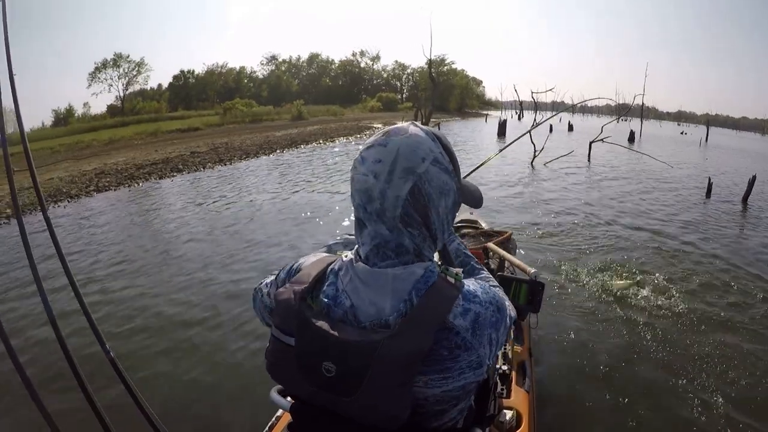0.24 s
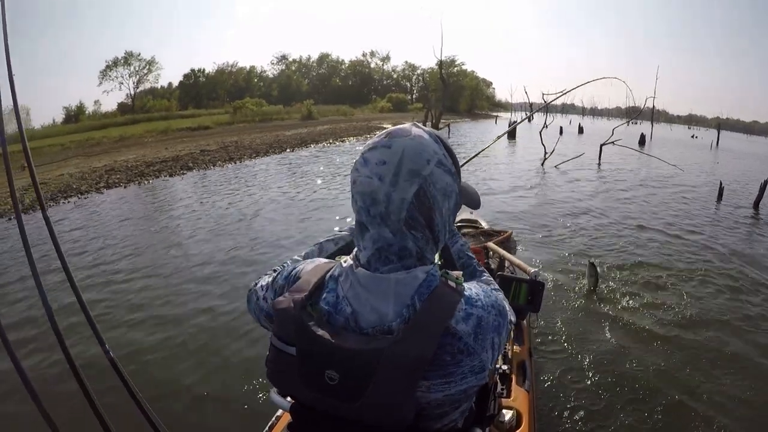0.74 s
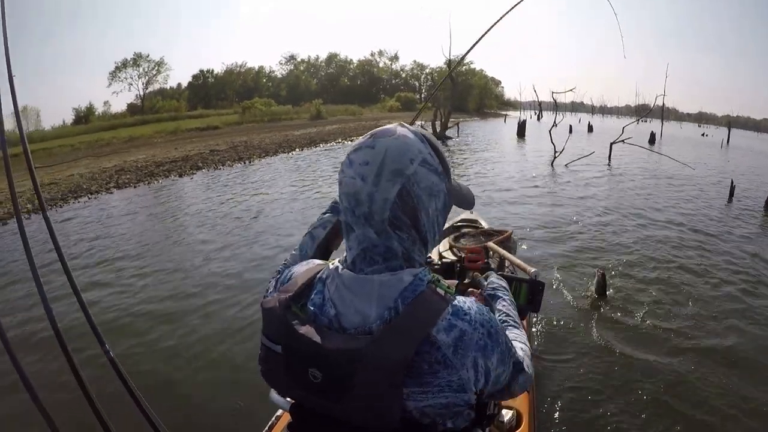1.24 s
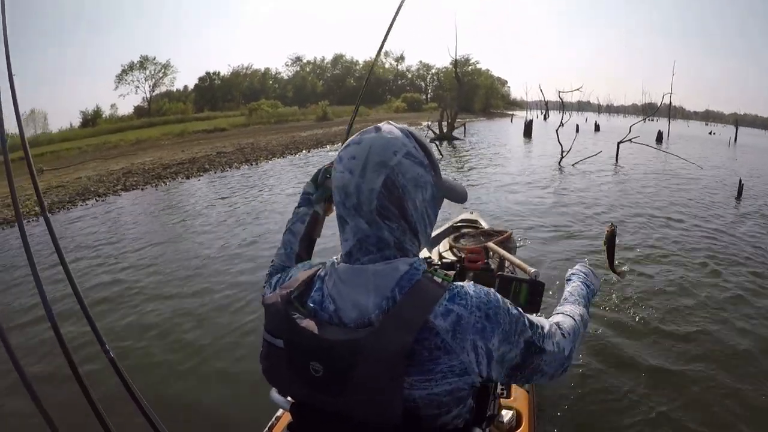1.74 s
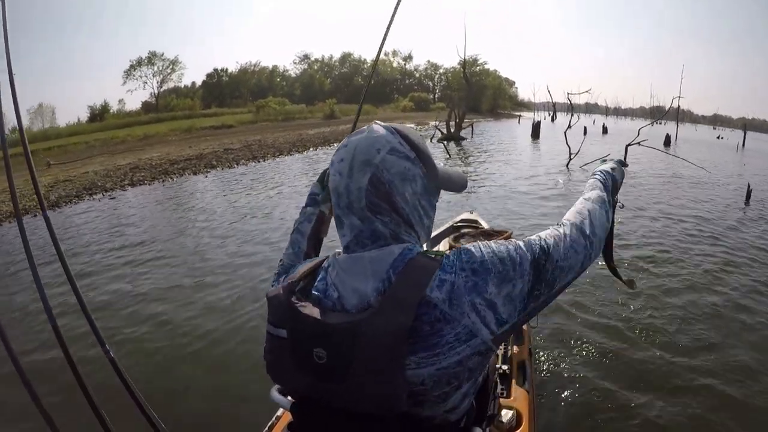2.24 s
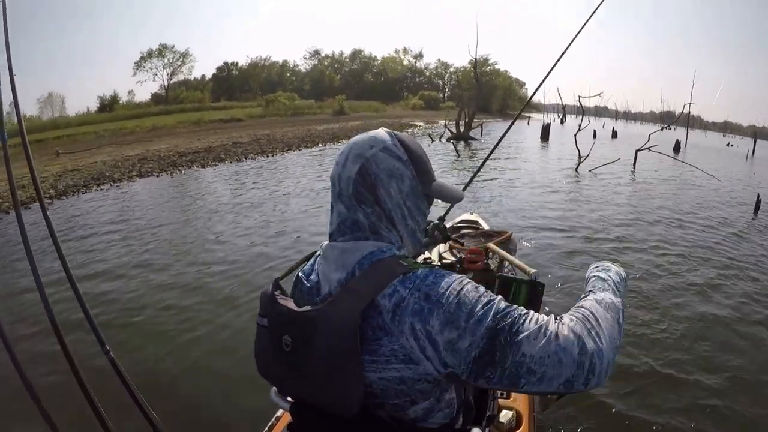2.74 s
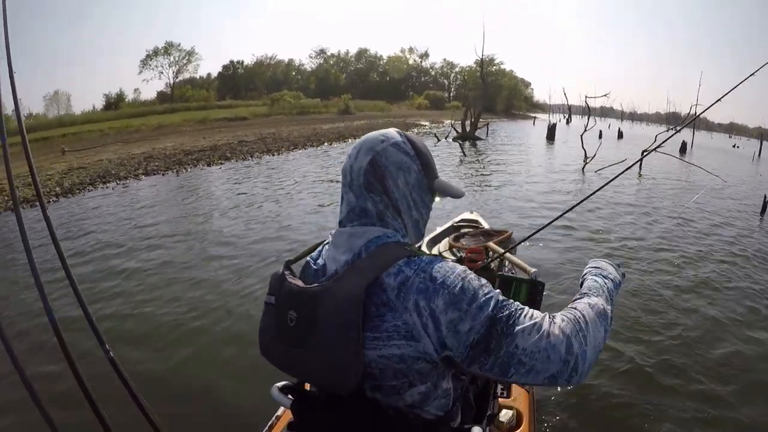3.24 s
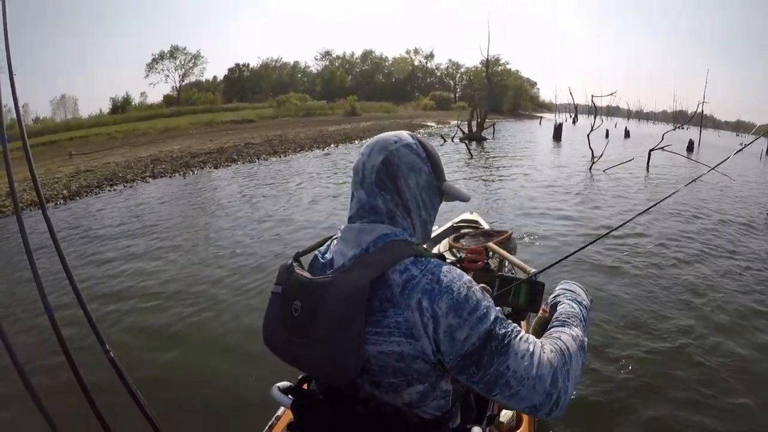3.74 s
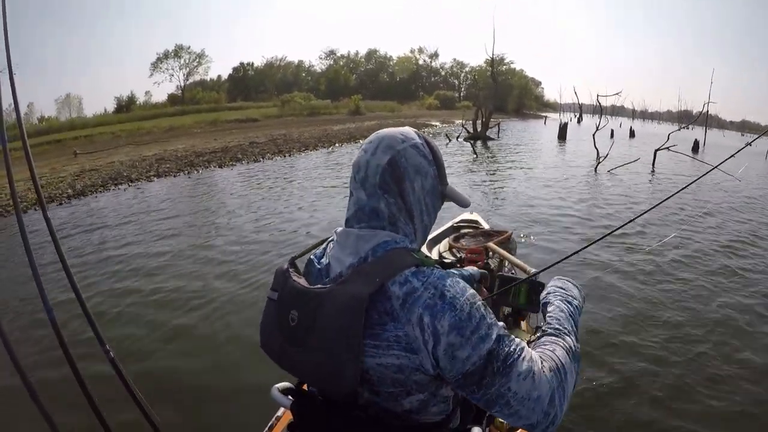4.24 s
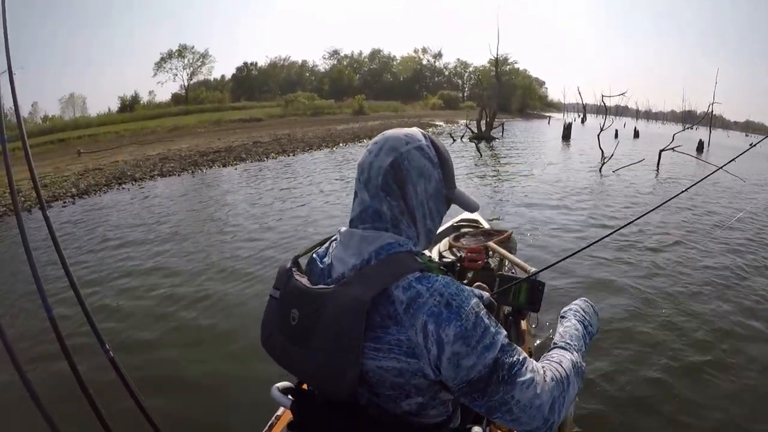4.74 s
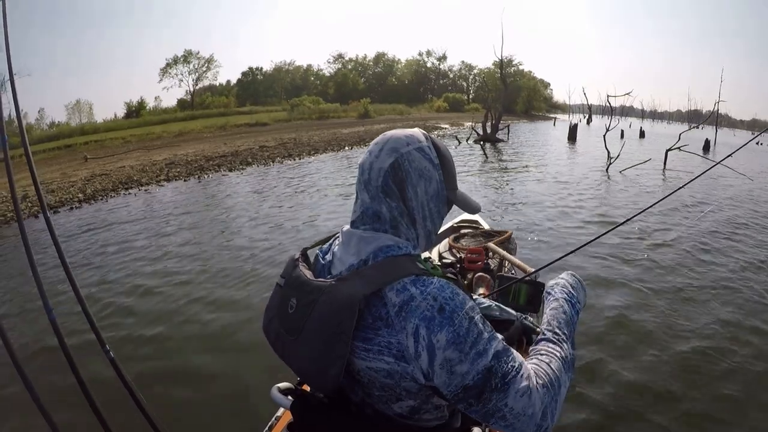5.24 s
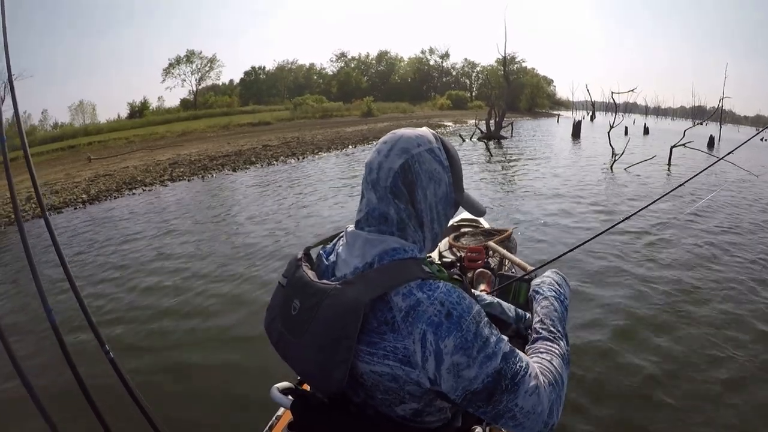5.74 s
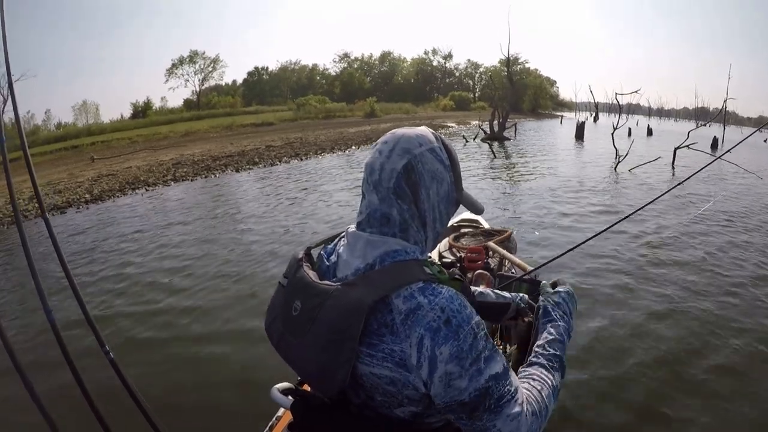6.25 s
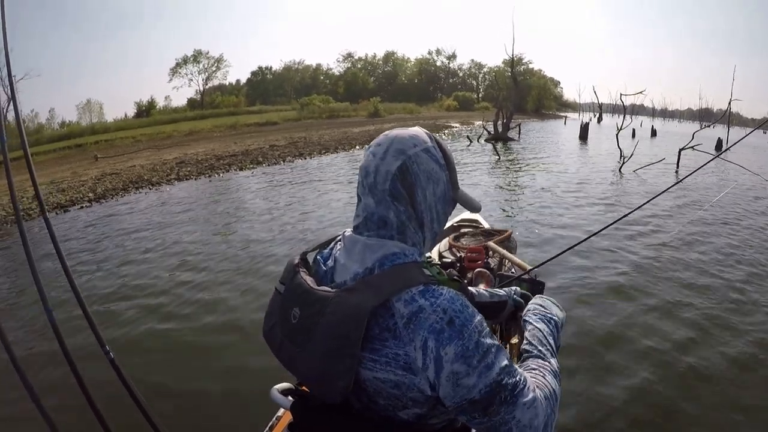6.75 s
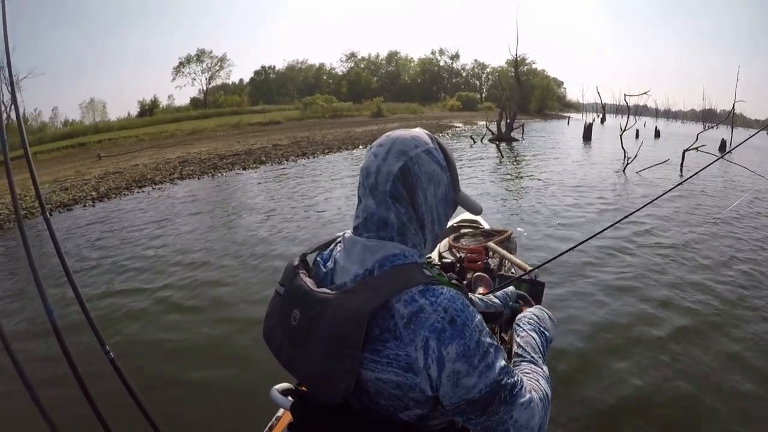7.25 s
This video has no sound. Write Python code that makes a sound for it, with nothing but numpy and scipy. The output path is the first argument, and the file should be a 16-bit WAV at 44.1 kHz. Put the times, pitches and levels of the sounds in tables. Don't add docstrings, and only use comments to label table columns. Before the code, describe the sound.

A small fish thrashes in spray beside a kayak, then hull knocks, tackle clicks and drips follow under low buffeting wind and hum.

```python
import sys
import numpy as np
from scipy import signal
from scipy.fft import rfft, irfft
from scipy.io import wavfile
from scipy.ndimage import uniform_filter1d

SR = 44100
rng = np.random.default_rng(int(sys.argv[2]) if len(sys.argv) > 2 else 0)


def master_out(mix):
    frames = np.transpose(np.atleast_2d(mix))
    ceiling = np.clip(frames, -1, 1)
    pcm = np.round(ceiling * 32767).astype(np.int16)
    wavfile.write(sys.argv[1], SR, pcm)


def invert_db(x):
    u = np.asarray(x, float) / 20
    return 10 ** u


N = 330074
T = np.arange(N) / SR

# time in seconds, gust at the ports in dB, vortex pull on the pole in dB.
WIND = [(0, -28.5, -40.5), (.3, -31.5, -43.5), (.7, -37, -40), (1.0, -36, -41), (1.4, -40.5, -36.5),
        (1.9, -34, -37.5), (2.95, -37, -35.5), (3.45, -52, -32), (3.65, -38.5, -39.5), (4.02, -28.5, -34.5),
        (4.42, -23.5, -36.5), (4.6, -34, -31), (5.77, -25, -29.5), (5.96, -32.5, -31), (6.21, -25, -26),
        (6.79, -28, -28), (7.48, -35, -30.5)]


def unit(x):
    return x / np.sqrt(np.mean(x ** 2))


def unit_peak(x):
    return x / np.abs(x).max()


def curves(table):
    s, *columns = np.transpose(table)
    return [np.interp(T, s, c, -120, -120) for c in columns]


def swells(start, length, db, rise, fall):
    start, length, db, fall = (np.reshape(v, (-1, 1)) for v in (start, length, db, fall))
    before = np.maximum(start - T, 0)
    after = np.maximum(T - start - length, 0)
    return invert_db(db - rise * before - fall * after).sum(axis=0)


def colour(x, table):
    hz, db = np.transpose(table)
    f = np.arange(N // 2 + 1) * SR / N + 1
    return unit(irfft(rfft(x) * invert_db(np.interp(np.log(f), np.log(hz), db)), N))


def ring(x, hz, width):
    return signal.lfilter(*signal.iirpeak(hz, hz / width, SR), x)


def flutter(hz, width):
    return unit(ring(ring(rng.standard_normal(N), hz, width), hz, width))


def walk(rate):
    k = int(SR / rate)
    held = np.repeat(rng.standard_normal(N // k + 1), k)
    return 1.204 * uniform_filter1d(uniform_filter1d(held, k), k)[:N]


def grit(rate, spread_db, smooth):
    size_db = spread_db * np.minimum(rng.exponential(size=N), 3)
    hits = (rng.random(N) < rate / SR) * invert_db(size_db)
    return unit(hits * rng.standard_normal(N)) + smooth * rng.standard_normal(N)


def add(out, s, x):
    i = max(int(s * SR), 0)
    out[..., i:i + x.shape[-1]] += x[..., :N - i]


def buffeting():
    # frequency in Hz, level in dB per Hz.
    shared_colour = [(15, -20), (30, 6.5), (45, -4), (60, 3.5), (110, -5.5), (150, -3.5), (260, -17),
                     (400, -31.5), (700, -71)]
    # frequency in Hz, level in dB per Hz.
    lone_colour = [(15, 8), (30, 6.5), (45, 1), (80, -2), (140, -1.5), (200, -4.5), (255, -19), (320, -42),
                   (600, -67)]
    # start in seconds, level in dB.
    puffs = [
        (.71, -32),
        (1.14, -37),
        (1.29, -29),
        (1.89, -36),
        (3.521, -32),
    ]
    gust_db, _ = curves(WIND)
    puff_s, puff_db = np.transpose(puffs)
    gust = invert_db(gust_db) + swells(puff_s, 0.0083, puff_db, 218, 168)
    both = colour(rng.standard_normal(N), shared_colour) * invert_db(1.36 * walk(10.0))
    left, right = (colour(rng.standard_normal(N), lone_colour) * invert_db(5.36 * walk(9.1)) for _ in range(2))
    return gust * (0.81 * both + np.array([0.11 * left - 0.27 * right, 1.07 * right]))


def pole_hum():
    # pitch in Hz, resonance width in Hz.
    hum_modes = [
        (85, 5),
        (189, 4.3),
        (387, 3),
    ]
    # start in seconds, length in seconds, level in dB.
    low_spells = [
        (0.196, 0.12, -40),
        (0.677, 0.046, -45),
        (1.006, 0.059, -39.5),
        (1.42, 1.0, -43),
        (4.014, 0.079, -27.5),
        (4.613, 0.46, -31.5),
        (5.25, 0.54, -28),
        (5.984, 0.82, -30.5),
        (6.884, 0.6, -33.5),
    ]
    # start in seconds, length in seconds, level in dB.
    rod_spells = [
        (0, 0.16, -49.5),
        (0.801, 0.71, -52.5),
        (2.636, .4, -52.5),
    ]
    _, pull_db = curves(WIND)
    low = invert_db(-51.5) + swells(*np.transpose(low_spells), 96, 85)
    rods = invert_db(-60) + swells(*np.transpose(rod_spells), 79, 40)
    out = np.zeros((2, N))
    for (hz, width), gain in zip(hum_modes, (low, invert_db(pull_db), rods)):
        tone = np.sqrt(2) * np.sin(2 * np.pi * hz * T + 2.1 * walk(width))
        hum = 0.81 * tone + 0.44 * flutter(hz, 2 * width)
        out += gain * hum * invert_db(np.array([[-.8], [.8]]))
    return out


def air():
    # frequency in Hz, level in dB.
    mid_colour = [(200, -66), (330, -72.5), (450, -79.5), (600, -85.5), (1100, -88.5), (2000, -95),
                  (3250, -96.5), (3600, -90), (5200, -90), (6300, -90), (7400, -96), (9500, -100),
                  (13500, -110), (15000, -124)]
    # frequency in Hz, level in dB.
    side_colour = [(200, -71), (330, -72), (450, -79), (800, -79), (1500, -88), (2000, -93), (3200, -99.5),
                   (4200, -93), (5200, -90), (6200, -86.5), (7200, -94), (8200, -96), (13500, -111),
                   (15000, -124)]
    mid = invert_db(-41.5) * colour(rng.standard_normal(N), mid_colour)
    side = invert_db(-44) * colour(rng.standard_normal(N), side_colour)
    swell = invert_db(0.2 * walk(1.4) + .7 * walk(25))
    return swell * np.array([mid + side, mid - side]) * invert_db(np.array([[-.6], [.6]]))


def camera():
    frame_hz, first_frame_s = 29.97, .0185
    ping_hz, ping_db, ping_s = 8600, -58, 0.0028
    whine_hz, whine_db = 6147, -66.5
    since = (T - first_frame_s + .5 / frame_hz) % (1 / frame_hz) - .5 / frame_hz
    shape = invert_db(ping_db) * np.exp(-(since / ping_s) ** 2)
    ping = shape * np.sin(2 * np.pi * ping_hz * since + 3 * walk(frame_hz))
    whine = invert_db(whine_db + 2.3 * walk(4.7)) * np.sin(2 * np.pi * whine_hz * T + 2.9 * walk(8.3))
    return ping + np.outer([1.5, .5], whine)


def bubble(hz, cycles, glide):
    u = np.arange(int(2.7 * cycles / hz * SR) + 4) * hz / SR / cycles
    turns = cycles * np.cumsum(2 ** (glide * (u - .3))) * u[1]
    return np.sin(2 * np.pi * turns) * unit_peak(u * np.exp(-4 * u))


def swarm(span, count, lo_hz, hi_hz, cycles, spread_db, glide):
    out = np.zeros(N)
    for s, pitch, size, length in rng.random((count, 4)):
        grain = bubble(lo_hz * (hi_hz / lo_hz) ** pitch, cycles * (.5 + length), glide)
        add(out, span[0] + (span[1] - span[0]) * s, invert_db(spread_db * size ** 2) * grain)
    return unit(out) * np.sqrt((span[1] - span[0]) * SR / N)


def thrash():
    # start in s, length in s, level in dB, fall in dB per s.
    bursts = [
        (0, 0.0079, -42.5, 92),
        (0, 0.25, -46, 16.5),
    ]
    # start in s, length in s, level in dB, rise and fall in dB per s.
    run_off = (1.0, 0, -49.5, 150, 255)
    # frequency in Hz, level in dB.
    spray_colour = [(600, -40), (1000, -4), (1500, -7), (2600, -2.5), (4200, -4.5), (5200, -8.5),
                    (6700, -2.5), (8200, -9.5), (11000, -20), (15000, -25)]
    start, length, db, fall = np.transpose(bursts)
    churn_end = invert_db(-130 * np.maximum(T - 0.85, 0))
    spray = swells(start, length, db, 0, fall) * churn_end + swells(*run_off)
    hiss = colour(grit(4000, 4.8, 0.55), spray_colour) * invert_db(2.0 * walk(70))
    fizz = swarm((0, 1.2), count=1200, lo_hz=1300, hi_hz=9500, cycles=6, spread_db=15, glide=.35)
    gurgle = swarm((0, 1.2), count=480, lo_hz=550, hi_hz=2600, cycles=5.5, spread_db=11, glide=0.3)
    drops = swarm((0, 1.2), count=110, lo_hz=2500, hi_hz=9000, cycles=2.5, spread_db=14, glide=.5)
    gurgle_gain = invert_db(-3 - 11 * T) * 0.83
    return spray * (0.61 * hiss + 0.33 * fizz + 0.27 * drops + gurgle_gain * gurgle)


def bubbles_and_drips():
    # start in seconds, peak in dB, pitch in Hz, glide in octaves.
    water_drips = [(0.018, -33.5, 2770, 0.13), (0.033, -36.5, 1520, 0.029), (.079, -35.5, 776, 0.11),
                   (.088, -38, 1600, 0.24), (.105, -40, 990, .2), (.12, -43, 1250, 0.45),
                   (.106, -43, 5440, 0.0077), (0.169, -38, 3200, 1.3), (0.181, -41, 1050, .2),
                   (0.188, -33, 1440, 1.1), (0.19, -37, 3620, .5), (.195, -36.5, 600, -0.065),
                   (.226, -43, 5170, 0.56), (.231, -40, 1160, -0.25), (0.257, -40, 2300, 1.1),
                   (.279, -38, 770, 0.29), (0.315, -37, 3350, 0.71), (0.36, -31, 2100, .3),
                   (.364, -39, 3500, 0.18), (0.401, -34, 3580, 1.9), (0.451, -50, 990, .05),
                   (0.463, -50, 950, 0.21), (.474, -43, 980, .05), (.474, -53, 1670, .2),
                   (.523, -51, 2400, .5), (.557, -40.5, 720, .3), (.564, -46, 2780, 0.3),
                   (.577, -45, 1100, .4), (.593, -43, 510, .5), (0.619, -38.5, 1520, 0.33),
                   (.62, -40, 544, .1), (.651, -52, 820, .05), (.653, -54, 1700, 0.22),
                   (.67, -48, 3300, .6), (0.683, -41, 1910, 1.3), (.704, -46, 740, .3),
                   (.706, -44, 3300, .05), (.745, -37, 5750, 0.09), (.756, -53, 1150, 0.37),
                   (.76, -48, 860, .1), (.765, -49, 2400, .3), (.783, -49, 1560, .05),
                   (.802, -50, 1130, .05), (.845, -40, 2800, 0.17), (.928, -42.5, 3000, 0.17),
                   (1.261, -41, 950, 0.21), (1.393, -43, 890, -0.053), (1.588, -47, 1680, -0.059)]
    # start in seconds, peak in dB, pitch
    # in Hz, glide in octaves.
    deck_drips = [(3.298, -41, 600, -0.026), (3.38, -44, 600, 0.12), (3.823, -28, 476, .25),
                  (4.056, -39, 3040, .3), (4.108, -40, 1420, .05), (4.122, -33, 3240, .2),
                  (4.14, -47, 3500, .1), (4.162, -42, 3730, 0.12), (4.163, -42, 1400, .1),
                  (4.176, -43, 1450, .3), (4.256, -45, 2170, .3), (4.294, -36.5, 2780, 0.02),
                  (4.297, -40, 1550, .05), (4.33, -42, 2780, .3), (4.411, -37, 4000, .2),
                  (4.412, -36, 1340, .1), (4.417, -44, 2160, 0.13), (4.431, -33, 926, 0.1),
                  (4.431, -43, 1900, .1), (4.44, -42, 1460, .3), (4.457, -39, 1480, .05),
                  (4.474, -45, 1030, .3), (4.49, -46, 1450, .1), (4.589, -39, 830, 0.18),
                  (5.488, -46, 1510, .05), (6.1, -41, 1300, 0.075), (6.372, -36.5, 1015, -.2),
                  (6.373, -33, 651, -0.15)]
    single = np.zeros(N)
    for s, db, hz, glide in water_drips + deck_drips:
        cycles = 10 * (hz / 1e3) ** 0.52
        add(single, s, invert_db(db) * bubble(hz, cycles, glide))
    return single * invert_db(3 * walk(500))


def crackles(table, dull_db, top_db, fizz_db):
    out, u = np.zeros(N), T[:SR // 12]
    for s, db, hz in table:
        t60 = .02 * (1 + 0.5 * min(invert_db(dull_db), 4))
        rise = np.minimum(u / .0022, 1) ** 2
        burst = rng.standard_normal((3, len(u))) * invert_db(-60 * u / t60) * rise
        centre = ring(ring(burst[0], hz, .5 * hz) + .5 * ring(burst[0], 1650, 1600), 2840, 3700)
        dull = ring(ring(burst[1], 810, 1200), 880, 1080)
        top = ring(ring(burst[2], 7200, 1900), 6400, 9500)
        share = np.sqrt(1 - min(invert_db(top_db), .95) ** 2)
        tick = share * unit_peak(centre) + invert_db(dull_db) * unit_peak(dull) + invert_db(top_db) * unit_peak(top)
        tick = signal.lfilter(*signal.butter(3, 9000, fs=SR), tick)
        fizz = ring(ring(burst[1], 14000, 7000), 14000, 7000)
        add(out, s - .0012, invert_db(db) * (tick + invert_db(fizz_db) * unit_peak(fizz)))
    return out


def fish_and_tackle():
    # start in seconds, peak in dB, centre in Hz.
    slaps = [(0.285, -34, 3430), (0.182, -35, 9000), (0.278, -38, 9500), (0.427, -31, 8000),
             (0.454, -30, 6500), (0.475, -28.5, 3740), (0.5636, -33, 2820), (0.5764, -43, 4120),
             (0.612, -38, 7000), (0.6704, -38.5, 7500), (0.695, -32, 7000), (0.7832, -30.5, 6170),
             (2.3046, -35, 6000), (2.313, -36, 5700), (2.4596, -36, 6200), (4.042, -27.5, 4000),
             (4.0568, -32, 1880), (4.103, -33, 1610), (4.243, -27, 2730), (4.089, -40, 6500),
             (6.0406, -33.5, 2600), (7.317, -32.5, 3700)]
    # start in seconds, peak in dB, centre in Hz.
    smacks = [
        (0.4121, -20.5, 3500),
        (4.2365, -23, 2590),
        (4.4562, -33.5, 3000),
    ]
    # start in seconds, peak in dB, centre in Hz.
    tackle = [(1.369, -41.5, 2000), (3.468, -34.5, 4800), (3.491, -43, 1200), (3.829, -33.5, 2900),
              (3.9773, -35, 3840), (3.998, -15, 1960), (4.1223, -30, 3330), (4.14, -30, 3620),
              (4.175, -29.5, 2170), (4.187, -25.5, 4130), (4.1985, -29, 1850), (4.293, -29, 1530),
              (4.33, -35, 2710), (4.153, -36, 4200), (4.162, -37, 3000), (4.257, -34, 2300),
              (4.308, -35, 5500), (4.081, -38, 3200), (4.4085, -29.5, 1510), (5.86, -32.5, 3480),
              (6.03, -38, 1490), (6.814, -44, 3000), (7.013, -40.5, 1860), (7.42, -44, 2500)]
    # start in seconds, peak in dB, centre in Hz.
    taps = [
        (3.051, -35, 1150),
        (5.2927, -37, 1660),
    ]
    # start in seconds, peak in dB, centre in Hz.
    clacks = [
        (5.6407, -47.5, 1510),
        (5.672, -35, 1520),
    ]
    # start in seconds, peak in dB, centre in Hz.
    snaps = [
        (0.353, -11, 3240),
        (3.065, -14.5, 3900),
        (3.067, -17.5, 8400),
        (4.2765, -24, 6800),
    ]
    # dull part in dB, top part in dB, fizz above the roll-off in dB.
    kinds = [
        (-23, -1, -24),
        (-15.5, -5, -30),
        (-11.5, -8, -34),
        (7.5, -2.5, -28),
        (19, -3, -26),
        (-17.5, -2.5, -18),
    ]
    tables = (slaps, smacks, tackle, taps, clacks, snaps)
    return sum(crackles(table, *kind) for table, kind in zip(tables, kinds))


def strikes(table, t60, common_db):
    # pitch in Hz, level in dB, 60 dB decay in seconds.
    hull = [(31.2, -21.5, 0.81), (61.2, -24.5, 0.34), (131.5, 0.5, 0.079), (246.6, -5.5, 0.073),
            (322.3, -14, 0.094)]
    # pitch in Hz, level in dB, 60 dB decay in seconds.
    deck = [(477, -3, 0.03), (600, -7.5, 0.051), (844, -7.5, 0.03), (1300, -5, 0.014)]
    out, u = np.zeros((2, N)), T[:SR // 2]
    chance = rng.standard_normal((len(table), 3, len(hull + deck)))
    for (s, db, hz, deck_db), (detune, uneven, phase) in zip(table, chance):
        modes = hull + [(f, g + deck_db, d) for f, g, d in deck]
        body = np.sin(2 * np.pi * hz * u) * invert_db(-60 * u / t60)
        for (f, g, d), a, b, c in zip(modes, detune, uneven, phase):
            level = invert_db(g + 1.83 * b - 60 * u / d)
            body += level * np.sin(2 * np.pi * f * (1 + 0.061 * a) * u + 2 * c)
        push = np.minimum(u / 0.00523, 1) ** 2
        blow = invert_db(db) * unit_peak(body * push) / np.hypot(1, invert_db(common_db))
        late = int(0.00065 * SR * min(abs(uneven[0]), 2))
        common = -invert_db(common_db) * np.roll(blow, late)
        add(out, s - .0045, np.array([common + blow, common - blow]))
    return out


def thumps():
    # start in seconds, peak in dB, pitch in Hz, deck ring in dB.
    thump_rows = [(0.234, -17, 299, -2), (0.247, -27, 319, -25), (0.49, -20.5, 172, -32),
                  (0.566, -20, 391, -11), (1.917, -25, 129, -25), (3.821, -8.5, 255, -18),
                  (3.846, -13.5, 232, -28), (4.002, -12, 196, -23), (4.215, -18, 230, -19),
                  (4.318, -21.5, 153, -33), (5.876, -19, 224, -20), (5.979, -31, 220, -6),
                  (6.157, -30, 144, -15)]
    return strikes(thump_rows, t60=0.097, common_db=9.5)


def knocks():
    # start in seconds, peak in dB, pitch in Hz, deck ring in dB.
    knock_rows = [(0.696, -5.5, 140, -12), (1.101, -11.5, 135.6, -29), (1.26, -13.5, 270, -1),
                  (1.297, -10.5, 220, -31), (1.891, -8.5, 244, -10), (2.699, -19.5, 141.5, -18),
                  (3.052, -7, 305, 5.5), (3.539, -20, 229, -22), (3.862, -7, 230, -17),
                  (4.045, -5.5, 238, -32), (4.382, -12, 248, -23), (4.409, -12.5, 129, -23),
                  (4.601, -23, 259, -14), (5.071, -5.5, 101, -32), (5.415, -7, 239, -17),
                  (5.449, -28, 129, -6), (5.643, -4.5, 233, -17), (5.698, -7, 268, -21),
                  (5.757, -11, 102, -38), (6.198, -6, 113, -11), (6.418, -15, 242, -25),
                  (6.521, -4, 131, -16.5), (6.696, -11.5, 101, -13)]
    return strikes(knock_rows, t60=0.071, common_db=-13)


def hands():
    # start in seconds, length in seconds, rustle in dB, scrape on the hull in dB.
    moves = [(1.449, 0.06, -46, -75), (2.299, 0.019, -50.5, -79), (2.49, 0.065, -52.5, -60),
             (3.966, 0.06, -53.5, -45), (4.082, 0.11, -47, -53), (4.241, 0.11, -51, -49.5),
             (4.425, 0.016, -66, -42.5), (4.462, 0.051, -54, -67), (4.589, 0.027, -58, -51),
             (5.301, 0.018, -57, -46), (5.335, 0.11, -88, -48.5), (5.488, 0.1, -87, -47),
             (5.664, 0.03, -58, -37), (5.766, 0.14, -78, -55), (5.967, 0.073, -57, -51),
             (6.594, 0.045, -88, -50.5), (6.687, 0.16, -90, -48), (6.88, 0.06, -88, -55)]
    # frequency in Hz, level in dB per Hz.
    cloth_colour = [(1200, -24), (2400, -2), (3400, 6), (4700, -0.5), (6500, 4), (8500, -13), (11000, -16),
                    (15000, -51)]
    # frequency in Hz, level in dB per Hz.
    scrape_colour = [(400, 7), (700, -4), (880, 5), (1020, -6), (1180, -2), (1340, -15), (1520, -7.5),
                     (1800, -18), (4000, -58)]
    crackle = swarm((1.4, 7.1), count=2600, lo_hz=2240, hi_hz=7500, cycles=3.6, spread_db=-10, glide=0.12)
    bumps = swarm((1.4, 7.1), count=900, lo_hz=900, hi_hz=3000, cycles=5, spread_db=14, glide=.05)
    cloth = 0.87 * colour(grit(6000, 6.7, 0.42), cloth_colour) + 0.29 * crackle
    scrape = colour(grit(900, 1.8, 1.0), scrape_colour)
    start, length, rustle_db, scrape_db = np.transpose(moves)
    rustle_gain = swells(start, length, rustle_db, 600, 454)
    scrape_gain = swells(start, length, scrape_db, 355, 158)
    patter = 0.44 * np.sqrt(rustle_gain * scrape_gain) * bumps
    return patter + rustle_gain * cloth * invert_db(2.2 * walk(60)) + scrape_gain * scrape * invert_db(1.6 * walk(30))


def jolts():
    # start in seconds, peak in dB, pitch in Hz, deck ring in dB.
    jolt_rows = [
        (2.052, -8, 154, -17),
        (3.3, -11, 226, -30),
        (3.382, -13.5, 221, -21),
        (3.505, -4.5, 200, -14.5),
        (4.343, -4, 254, -1),
        (6.377, -3, 221, -11.5),
        (3.056, -15, 172, -24),
        (4.06, -9, 114, -30),
    ]
    return strikes(jolt_rows, t60=0.082, common_db=-5.5)


def mount_sway():
    # start in seconds, length in seconds, level in dB.
    sways = [
        (3.872, 0.75, -25.5),
        (4.798, 0.83, -42),
        (5.704, 0.16, -25),
    ]
    # pitch in Hz, width in Hz.
    sway_mode = (67, 3.4)
    gain = swells(*np.transpose(sways), 200, 120)
    return np.outer([.8, -1.1], gain * flutter(*sway_mode))


def ports(x):
    # frequency in Hz, phase gap between the ports in radians.
    phase_gap = [(0, 0), (350, 1.5), (800, 2.3), (1500, 1.5), (2600, .7), (4200, .7), (5500, 1.6),
                 (7000, 1.8), (9500, 1.3), (13000, 1)]
    hz, lead = np.transpose(phase_gap)
    turn = np.exp(.5j * np.interp(np.arange(N // 2 + 1) * SR / N, hz, lead))
    lift = 1 / turn.real
    return irfft(rfft(x) * lift * np.array([turn, turn.conj()]), N)


def scene():
    near = thrash() + bubbles_and_drips() + fish_and_tackle() + hands()
    near = near * invert_db(np.array([[-1.6], [1.6]]))
    wind = buffeting() + pole_hum() + mount_sway()
    blows = thumps() + knocks() + jolts()
    return ports(near) + blows + wind + air() + camera()


def band_limit(x):
    return signal.sosfilt(signal.butter(12, 15300, fs=SR, output="sos"), x)


def record(dry):
    limited = np.tanh(1.113 * dry) / 1.057
    return band_limit(limited)


dry = scene()
out = record(dry)
master_out(out)
```